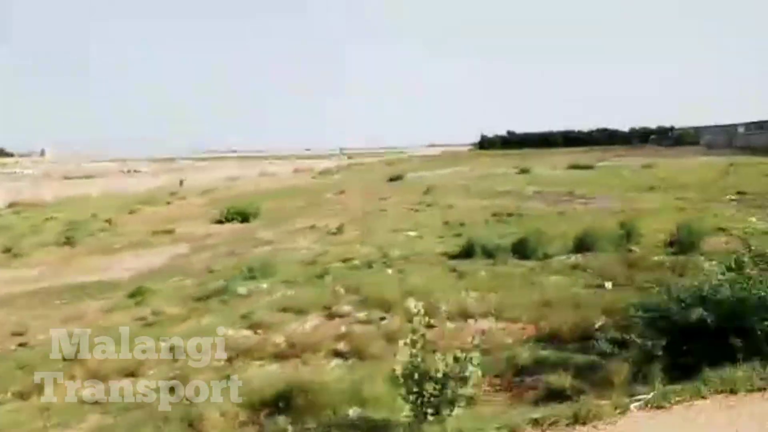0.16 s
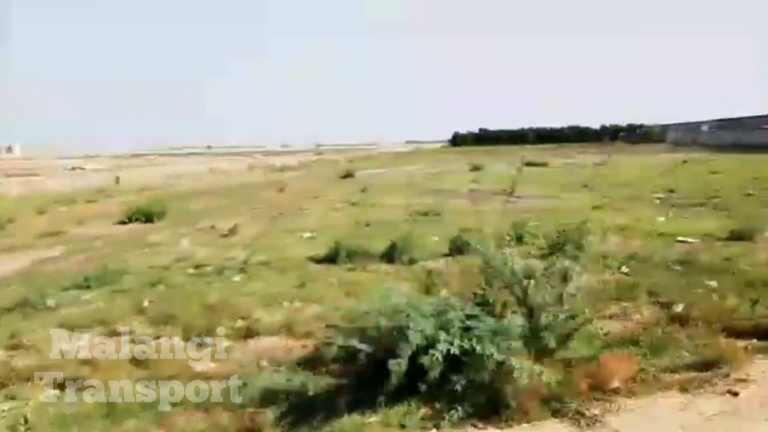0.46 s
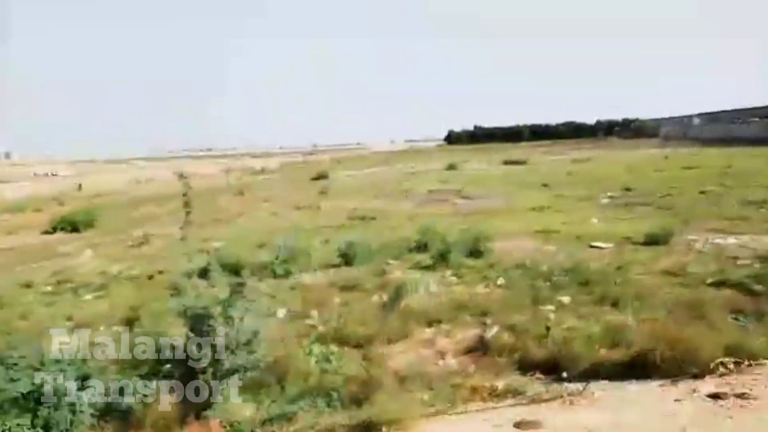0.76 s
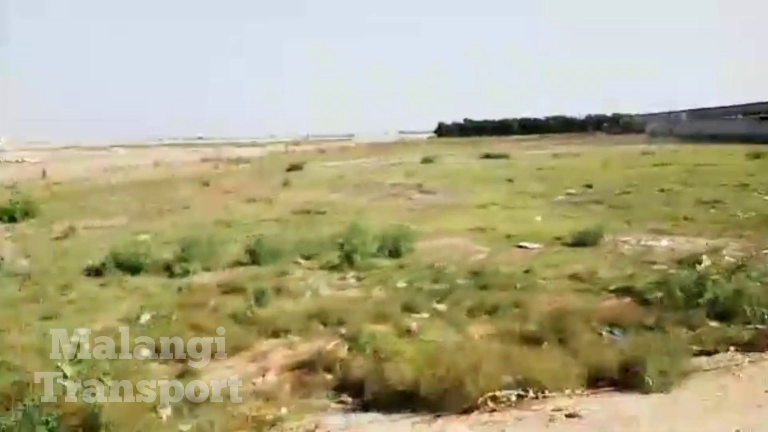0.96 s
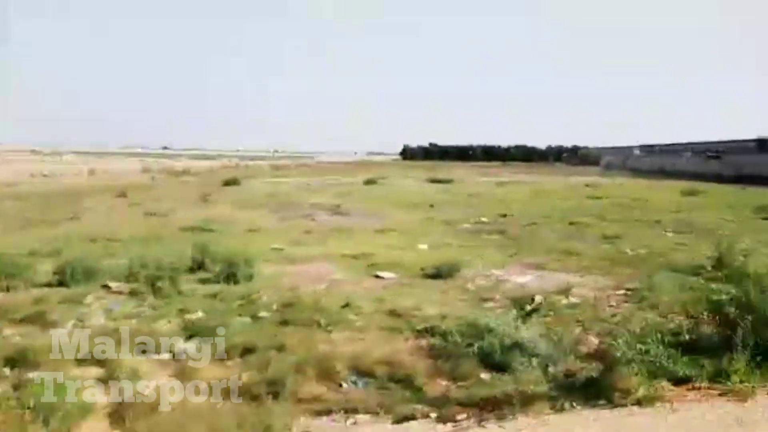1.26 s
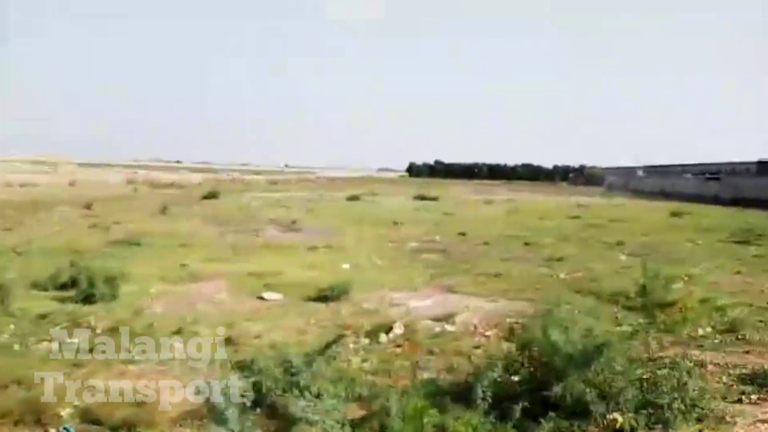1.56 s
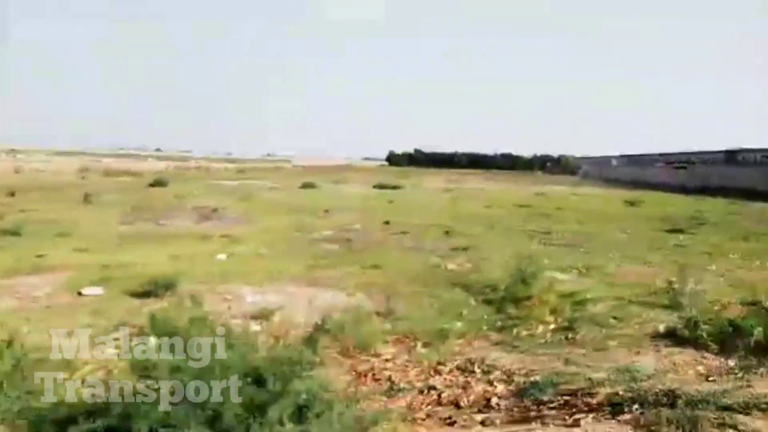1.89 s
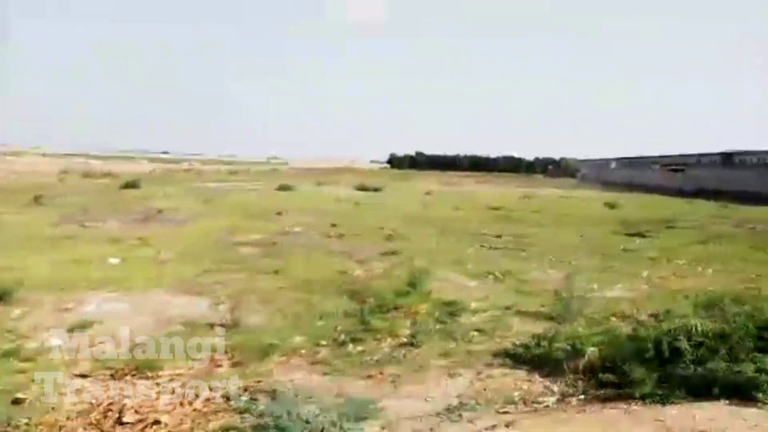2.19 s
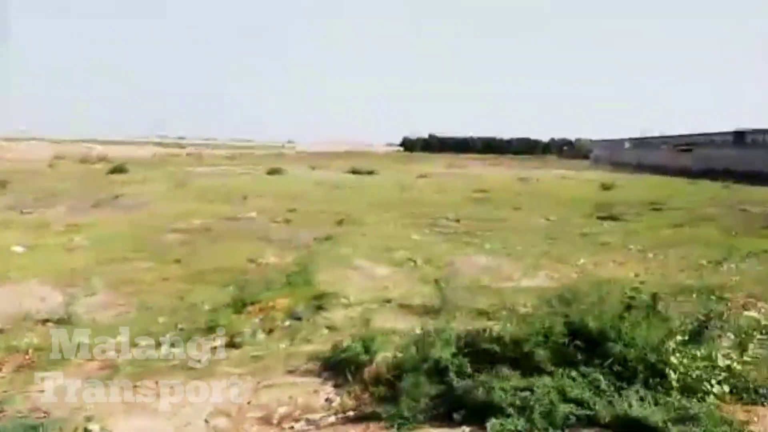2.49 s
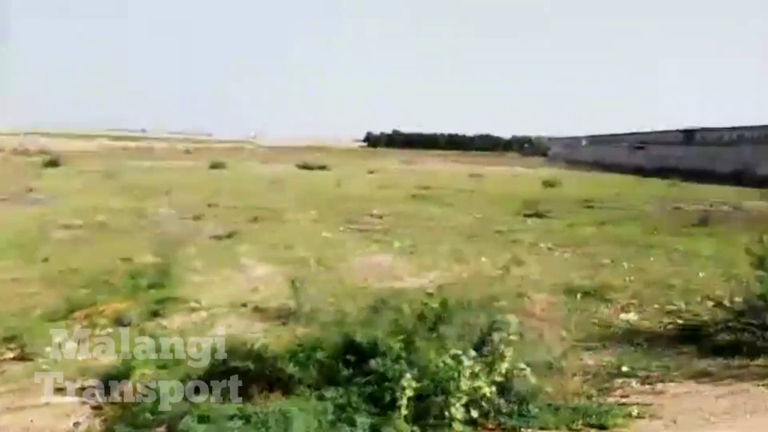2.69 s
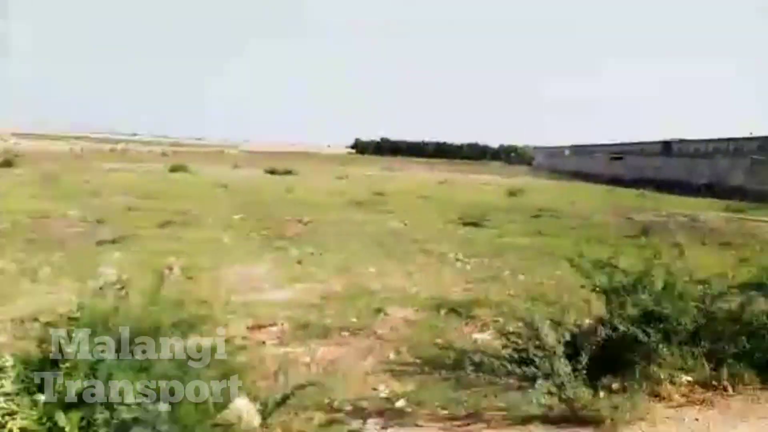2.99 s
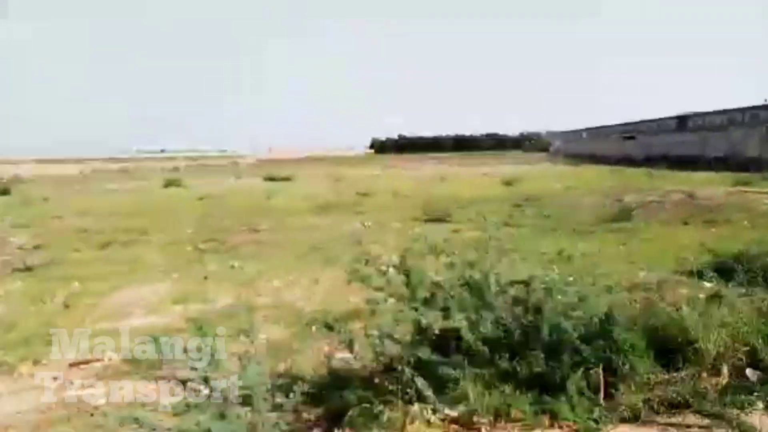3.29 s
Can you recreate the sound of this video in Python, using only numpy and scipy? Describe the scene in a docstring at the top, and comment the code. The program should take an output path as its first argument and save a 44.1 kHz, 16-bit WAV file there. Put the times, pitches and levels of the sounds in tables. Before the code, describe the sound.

A truck drives along, then honks its loud air horn twice.

```python
"""In the cab of a diesel truck on an open road. The engine pulls with a knocking drone, then the driver
lifts off, the turbo whistle winds down and the truck coasts over tyre and cab rumble. Loose fittings
rattle and rubbing metal squeals. Then come two presses of a warbling air horn, whose valve feeds six
trumpets in quick rotation; the blasts bounce off the truck body and the roadside."""
import sys
import numpy as np
from scipy import signal
from scipy.fft import rfft, irfft
from scipy.io import wavfile
from scipy.ndimage import uniform_filter1d

SR = 44100
rng = np.random.default_rng(int(sys.argv[2]) if len(sys.argv) > 2 else 0)


def output_pcm(signal):
    """Save a mono or channel-first signal as 16-bit PCM at the path in sys.argv[1].

    Samples are clipped to [-1, 1] before scaling.
    """
    pcm = np.clip(np.atleast_2d(signal).T, -1, 1) * 32767
    wavfile.write(sys.argv[1], SR, np.round(pcm).astype(np.int16))


N = 152145
TOP_HZ = 15700


def undb(db):
    """Decibels to gain."""
    return 10 ** (np.asarray(db) / 20)


def unit(x):
    """Scale to rms 1."""
    return x / np.sqrt(np.mean(x ** 2))


def colour(x, points):
    """EQ by a curve of (frequency [Hz], gain [dB]) points."""
    hz, db = np.array(points).T
    f = np.maximum(np.fft.rfftfreq(2 * N, 1 / SR), 1)
    gain = undb(np.interp(np.log(f), np.log(hz), db))
    return irfft(rfft(x, 2 * N) * gain)[..., :N]


def band(hz, octaves):
    """Noise in a bell around a centre, rms 1."""
    f = np.maximum(np.fft.rfftfreq(N, 1 / SR), 1)
    bell = np.exp(-.5 * (np.log2(f / hz) / octaves) ** 2)
    return unit(irfft(rfft(rng.standard_normal(N)) * bell, N))


def wobble(per_s):
    """Smooth random modulation, rms 1."""
    hold = max(int(SR / per_s), 1)
    steps = np.repeat(rng.standard_normal(N)[:N // hold + 1], hold)
    return unit(uniform_filter1d(steps, hold)[:N])


def lag(x, seconds):
    """One-pole smoothing."""
    pole = np.exp(-1 / (seconds * SR))
    return signal.lfilter([1 - pole], [1, -pole], x)


def reverb(x, t, t60):
    """Dense reflections that die away by 60 dB in t60 seconds."""
    tail = unit(rng.standard_normal(N) * 1000 ** (-t / t60)) / np.sqrt(N)
    return signal.fftconvolve(x, tail)[:N]


# Presses of the horn (start [s], end [s], air supply [dB])
PRESSES = [(2.544, 2.741, 1), (2.794, 3.078, 1)]
# Valve rotation, stalling between presses (time [s], position [turns])
VALVE_TURNS = [(2.54, -2.75), (2.700, -.3), (2.712, -.05), (2.775, .02), (2.795, .52), (2.838, .6),
               (2.862, 1), (3.055, 4), (3.1, 4.45)]
# Trumpet voices (nominal pitch [Hz], harmonics 1 to 7 [dB each], upper harmonics [dB])
TRUMPETS = [ (325.8, -34, -26.5, -29, -24, -47, -31.5, -35.5, -47.5),
            (366.6, -26, -29, -27.5, -30, -38, -34, -35.5, -48),
            (390.6, -23, -24, -30, -23.5, -27, -30.5, -39, -38),
            (443, -22.5, -30.5, -20, -24.5, -36, -38.5, -36, -40.5),
            (493, -32.5, -33, -21, -45, -38, -49, -43.5, -53.5),
            (575.8, -29, -24.5, -37, -39.5, -34.5, -58, -48, -58)]
# Each trumpet's valve port (place [turns], opening [turns], leak when shut [fraction],
# pitch bend [fraction per turn], pitch drop in a stall [fraction])
PORTS = [(.59, .7, .3, .04, .007), (.22, .48, .45, .025, .06), (.15, .29, .37, .06, .03),
         (-.05, .48, .41, .06, .017), (.56, .71, .13, -.06, 0), (.57, .51, .16, -.04, .018)]
# Brassy sheen on the upper harmonics (frequency [Hz], gain [dB])
BRASS_EQ = [(3100, -6), (3300, -14), (3500, -3.5), (3750, -12), (4400, -7), (5000, -11), (8000, -18),
            (11000, -12.5), (15500, -25)]
# Hiss of escaping air (frequency [Hz], gain [dB])
AIR_EQ = [(300, -4.5), (1400, 10), (2600, -6), (4500, -15.5), (9000, -14), (15000, -30)]


def air_horn(t, attack_s=.0058, release_s=.0086, sag=.016, stall_turns_per_s=8, flare_db=3.5):
    """Each trumpet swells and bends once per valve turn; in a stall they flare and most go flat."""
    presses = sum(undb(db) * ((t > start) & (t < end)) for start, end, db in PRESSES)
    supply = lag(presses, attack_s)
    live = t > PRESSES[0][0]
    turns = np.interp(t, *np.array(VALVE_TURNS).T)
    slowness = np.exp(-(np.gradient(turns, t) / stall_turns_per_s) ** 2)
    stall = lag(slowness * supply, attack_s)
    flare = undb(flare_db * stall[live])
    brass = np.zeros(N)
    for (hz, *low_db, high_db), (place, opening, leak, bend, drop) in zip(TRUMPETS, PORTS):
        offset = (turns - place + .5) % 1 - .5
        valve = np.maximum(np.exp(-(2 * offset / opening) ** 4), leak)
        valve_ahead = np.interp(t + release_s, t, valve)  # opens early to offset the pressure lag
        pressure = lag(supply * undb(1.2 * wobble(19)) * valve_ahead, release_s)
        jitter = .004 * wobble(60) + .003 * wobble(900)  # unsteady pitch and reed rasp
        pitch = hz * (1 + sag * (pressure - 1) + bend * offset - drop * stall + jitter)
        phase = 2 * np.pi * (np.cumsum(pitch[live]) / SR + rng.random())
        body = pressure[live]
        bite = flare * body ** 1.21  # higher harmonics grow faster with pressure
        upper_hz = hz * np.arange(len(low_db) + .5, TOP_HZ // hz)
        upper_db = high_db + np.interp(upper_hz, *np.array(BRASS_EQ).T)
        for k, db in enumerate(np.r_[low_db, upper_db], 1):
            brass[live] += undb(db) * (bite if k > 3 else body) * np.sin(k * phase)
    surge = 1 + .33 * np.cos(2 * np.pi * (turns - .1))  # the hiss pulses once a turn
    hiss = unit(colour(rng.standard_normal(N), AIR_EQ)) * lag(supply, release_s) * surge
    return undb(.38) * brass + undb(-28.5) * hiss


# Bright tone of the roadside echo (frequency [Hz], gain [dB])
ROADSIDE_EQ = [(200, -4.5), (1500, -1.5), (4000, 5.5), (10000, 4), (15000, 4)]


def horn_echoes(blast, t):
    """A tight slap off the truck body and a longer tail off the roadside."""
    slap = reverb(blast, t, t60=.1)
    tail = colour(reverb(blast, t, t60=.69), ROADSIDE_EQ)
    return undb(-6.5) * slap + undb(-9.5) * tail


LIFT_S = 1.131  # the driver lifts off
# Engine speed (time [s], rate [firings/s])
FIRING_RATE = [(0, 70), (.6, 70.7), (1.1, 70.6), (1.25, 72), (1.42, 68), (1.7, 71), (2.1, 68.5),
               (2.5, 65.5), (3.45, 62)]
# Tones of the engine hum (order [multiple of crank rate], pulling [dB], coasting [dB])
ORDERS = [(7, -48.5, -50), (9, -50, -55.5), (10, -41.5, -48.5), (12, -36.5, -41.5), (14, -44.5, -47.5),
          (18, -47.5, -47), (27, -49, -50)]
# Clattery tone of combustion (frequency [Hz], gain [dB])
KNOCK_EQ = [(300, -10), (600, -1), (780, -14), (1050, 0.5), (1230, -1), (1340, 3.5), (1480, -1),
            (2000, -7.5), (2600, -10), (3500, -23), (9500, -29), (12000, -32), (15500, -33)]


def engine(t, lift_fade_s=.059, drone_hz=66.3, drone_db=-40, knock_db=-37.5):
    """Crank orders hum in the cab; under load the exhaust drones and combustion noise throbs."""
    load = .5 - .5 * np.tanh((t - LIFT_S) / lift_fade_s)
    rate = np.interp(t, *np.array(FIRING_RATE).T) * (1 + .0054 * wobble(15))
    firings = np.cumsum(rate) / SR
    crank = firings / 3  # three firings a turn
    hum = np.zeros(N)
    for order, pull_db, coast_db in ORDERS:
        gain = undb(coast_db + (pull_db - coast_db) * load + 2 * wobble(12))
        hum += gain * np.sqrt(2) * np.sin(2 * np.pi * (order * crank + rng.random()))
    throb = 1 + .18 * np.cos(2 * np.pi * firings) * (.5 + .5 * wobble(73.3))
    drone = undb(drone_db + wobble(11.6)) * np.sqrt(2) * np.sin(2 * np.pi * drone_hz * t)
    knock = undb(knock_db) * throb * unit(colour(rng.standard_normal(N), KNOCK_EQ))
    return hum + load * (drone + knock)


def turbo(t, whistle_hz=4085, width_hz=790, fall_hz_per_s=5000, lead_s=.083, level_db=-53.5):
    """A breathy, fluttering whistle that winds down as the driver lifts off."""
    falling_s = np.clip(t - LIFT_S + lead_s, 0, .25)
    hz = whistle_hz * (1 + .0071 * wobble(5.1)) - fall_hz_per_s * falling_s
    phase = 2 * np.pi * np.cumsum(hz) / SR
    whistle = unit(wobble(width_hz) * np.cos(phase) + wobble(width_hz) * np.sin(phase))
    flutter_db = 2.2 * wobble(70)
    fade = .5 - .5 * np.tanh((t - LIFT_S) / .02 - 1)
    return whistle * undb(level_db + flutter_db) * fade


# Bass-heavy tone of the road bed (frequency [Hz], gain [dB])
ROAD_EQ = [(40, -9), (78, -17), (112, -6), (180, -8.5), (235, -6), (274, -1.5), (362, -9), (420, -8),
           (620, -12.5), (800, -16.5), (1150, -17), (1600, -22.5), (4200, -42.5), (6000, -48), (8800, -43),
           (11500, -45), (15500, -53)]


def road_rumble(t, level_db=-33.5, flicker_db=.58, swell_db=.04, slope_db_per_s=-.78):
    """Tyre, wind and cab rumble: octave bands that flicker separately and ease down together."""
    centres_hz = 25 * 2. ** np.arange(10)
    bands = sum(np.sqrt(hz) * band(hz, .42) * undb(flicker_db * wobble(20)) for hz in centres_hz)
    gain = undb(level_db + swell_db * wobble(5) + slope_db_per_s * (t - t.mean()))
    return unit(colour(bands, ROAD_EQ)) * gain


# Rattle hits (time [s], level [dB], centre [Hz], width [octaves], attack [s], decay [s])
RATTLES = [(1.586, -48.5, 8400, 0.61, 0.0038, 0.024), (1.786, -40, 10860, .8, .005, 0.014),
           (1.811, -41.5, 5000, 1, 0.0056, 0.011), (1.819, -34.5, 8650, 0.56, 0.00089, 0.0027),
           (1.817, -36.5, 7950, 0.27, .003, 0.0092), (1.884, -47.5, 9850, .8, .005, .011),
           (1.933, -50, 3800, .8, 0.0041, 0.0068), (3.211, -42, 3700, 0.068, 0.0055, .011),
           (3.309, -53, 9800, .35, .005, 0.008), (3.415, -55, 4700, 0.16, .005, 0.0078)]


def rattles(t, chatter_db=-67):
    """Loose fittings chatter faintly all the time and clatter on bumps."""
    chatter = band(hz=9000, octaves=.5) * undb(8 * np.minimum(wobble(120), 2))
    out = undb(chatter_db) * unit(chatter)
    for start, db, hz, octaves, attack, decay in RATTLES:
        age = np.maximum(t - start, 0)
        envelope = np.minimum(age / attack, 1) * np.exp(-np.maximum(age - attack, 0) / decay)
        out += undb(db) * band(hz, octaves) * envelope
    return out


# Swells of the squeal (time [s], level [dB])
SQUEAL_SWELLS = [(2.232, -72), (2.248, -49), (2.275, -50), (2.297, -51), (2.315, -42.5), (2.335, -42),
                 (2.36, -61.5), (2.54, -53.5), (2.64, -49)]


def metal_squeal(t, pitch_hz=6080, roughness=.028, octave_db=-15):
    """A thin, grainy squeal of rubbing metal that holds its pitch, like a brake."""
    phase = 2 * np.pi * np.cumsum(pitch_hz * (1 + roughness * wobble(3500))) / SR
    swell_db = np.interp(t, *np.array(SQUEAL_SWELLS).T, left=-np.inf, right=-np.inf)
    grain_db = 3.2 * wobble(140)
    return undb(swell_db + grain_db) * (np.sin(phase) + undb(octave_db) * np.sin(2 * phase))


def scene():
    """The horn and its echoes up front, over the bed of driving sounds."""
    t = np.arange(N) / SR
    blast = air_horn(t)
    echoes = horn_echoes(blast, t)
    driving = engine(t) + turbo(t) + road_rumble(t) + rattles(t) + metal_squeal(t)
    return (blast + echoes + driving)[None]


# Treble roll-off of the microphone (frequency [Hz], gain [dB])
MIC_EQ = [(9000, 0), (11500, -5.5), (15500, -10.5)]


def record(dry):
    """The microphone softens the treble and a steep low-pass cuts the very top."""
    low_pass = signal.ellip(10, .2, 80, TOP_HZ, fs=SR, output="sos")
    return signal.sosfilt(low_pass, colour(dry, MIC_EQ))


dry = scene()
out = record(dry)
output_pcm(out)
```